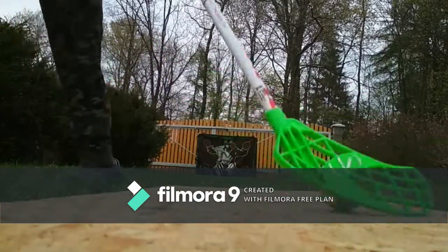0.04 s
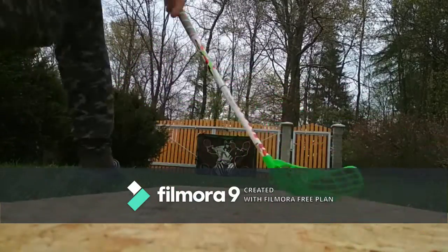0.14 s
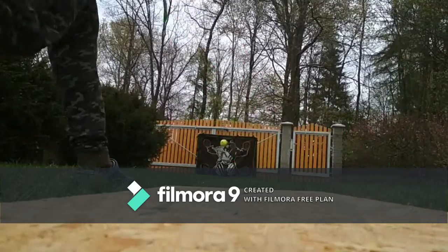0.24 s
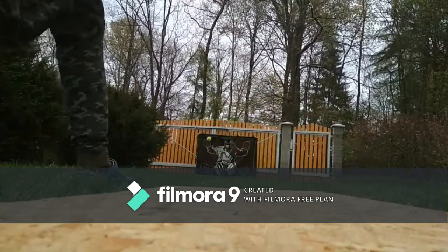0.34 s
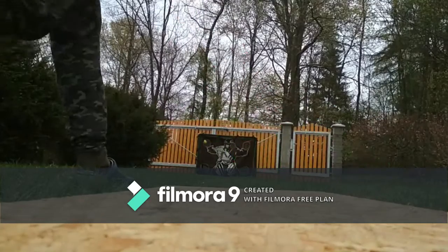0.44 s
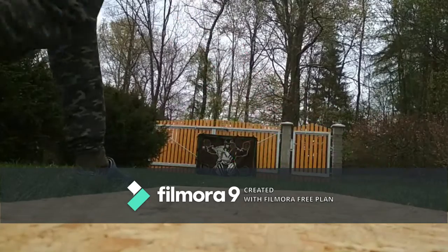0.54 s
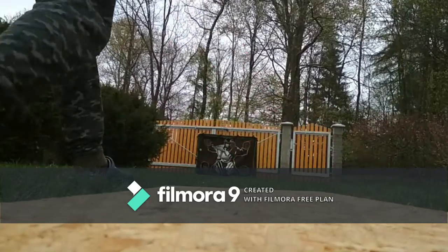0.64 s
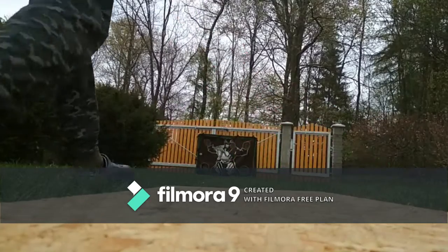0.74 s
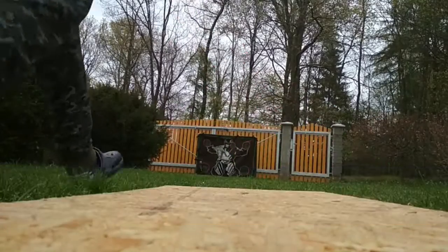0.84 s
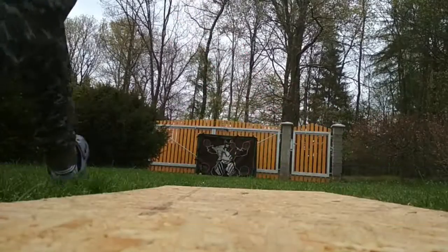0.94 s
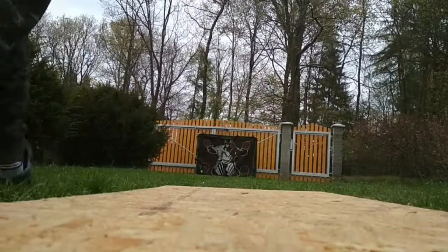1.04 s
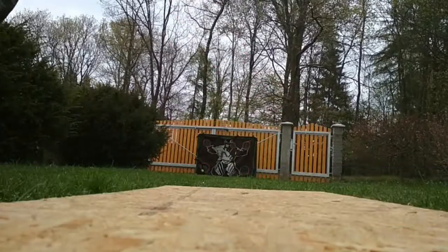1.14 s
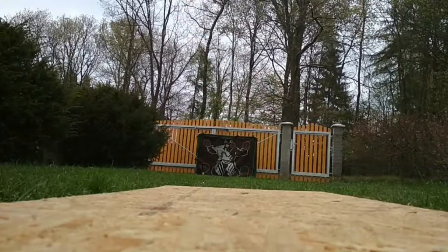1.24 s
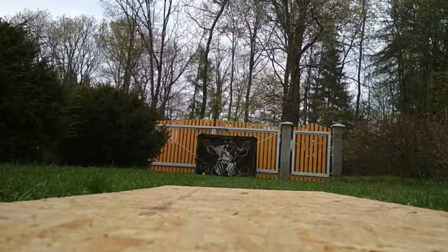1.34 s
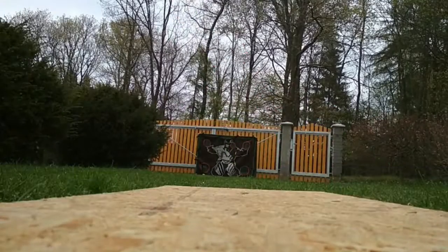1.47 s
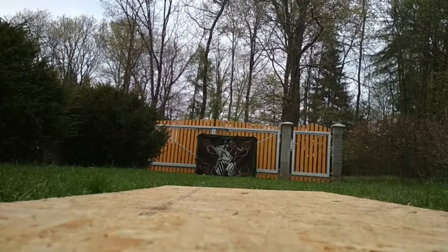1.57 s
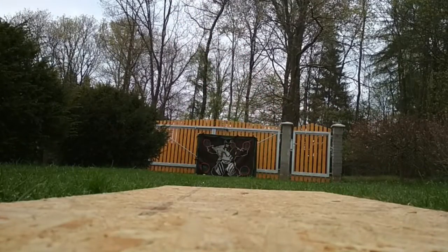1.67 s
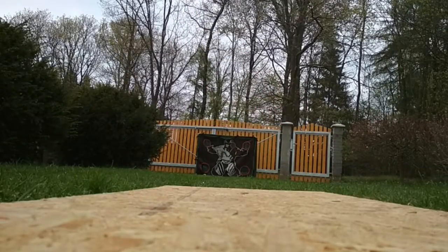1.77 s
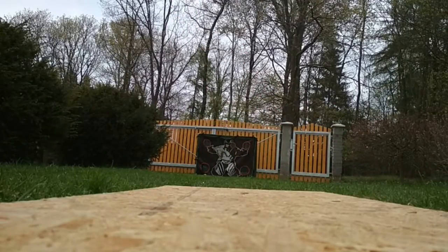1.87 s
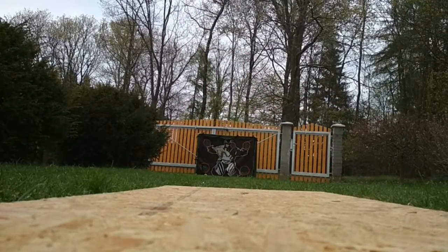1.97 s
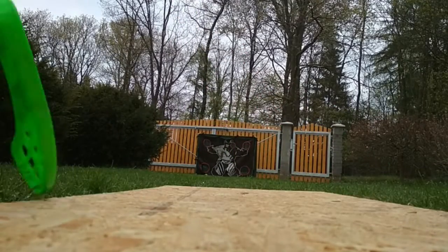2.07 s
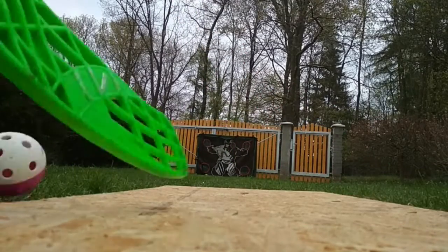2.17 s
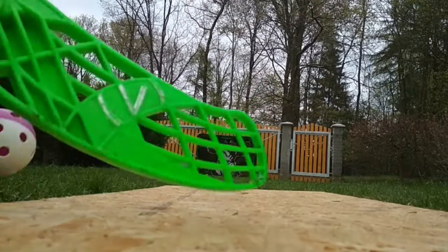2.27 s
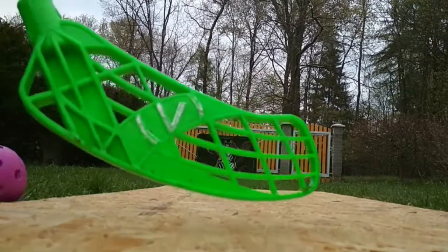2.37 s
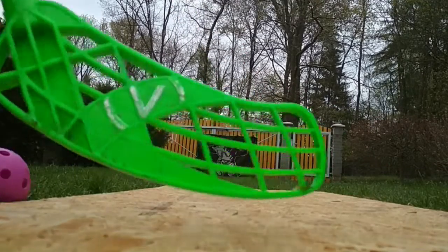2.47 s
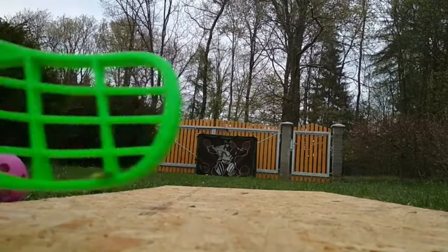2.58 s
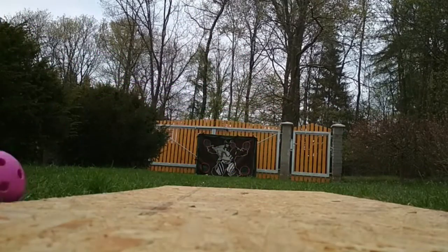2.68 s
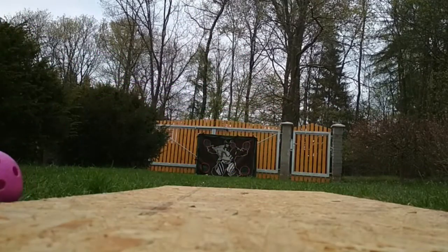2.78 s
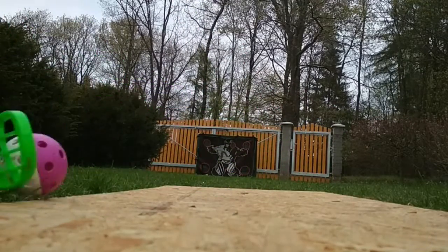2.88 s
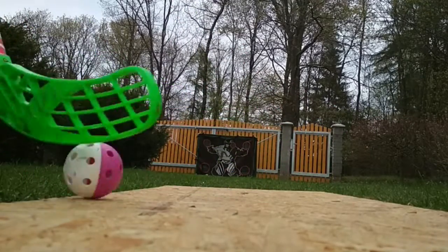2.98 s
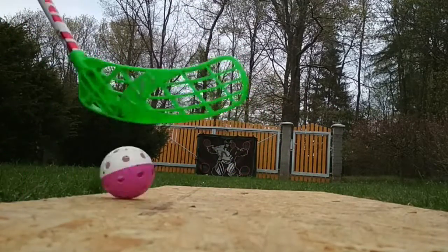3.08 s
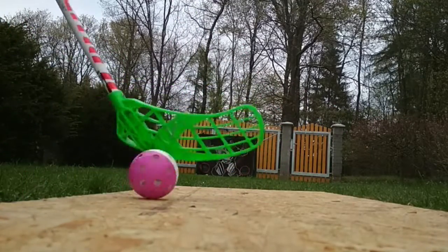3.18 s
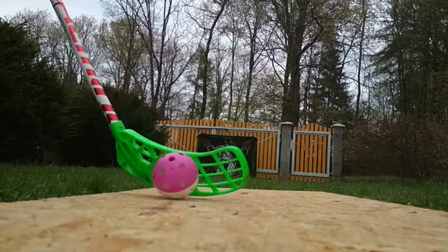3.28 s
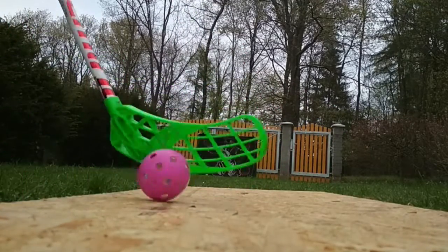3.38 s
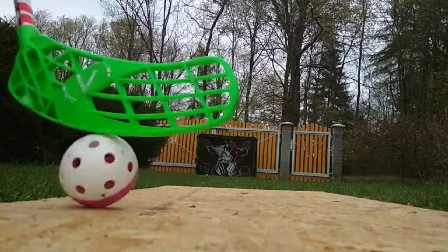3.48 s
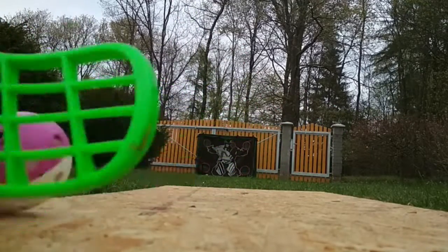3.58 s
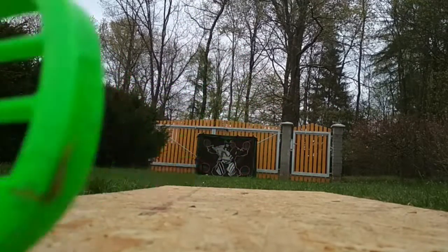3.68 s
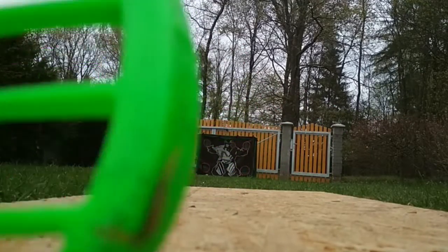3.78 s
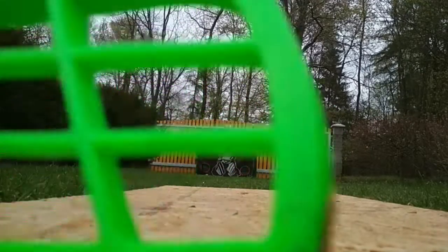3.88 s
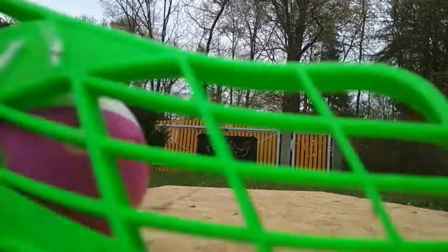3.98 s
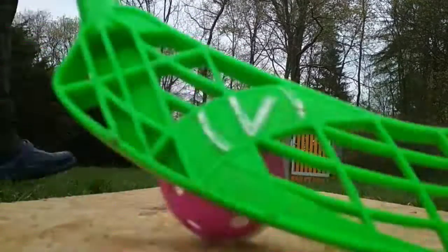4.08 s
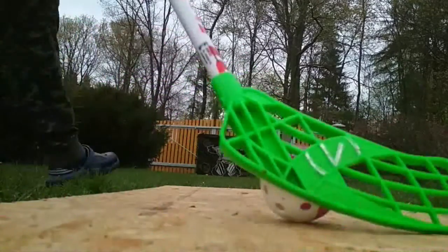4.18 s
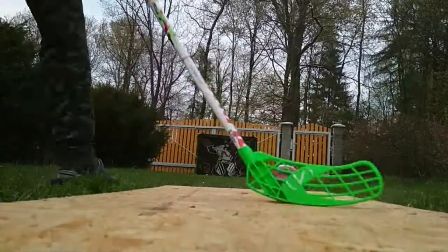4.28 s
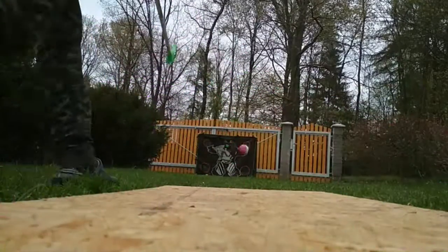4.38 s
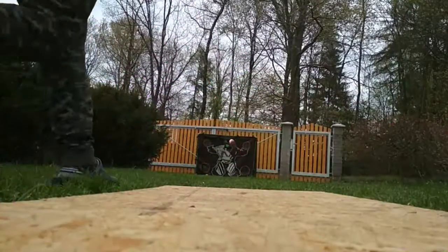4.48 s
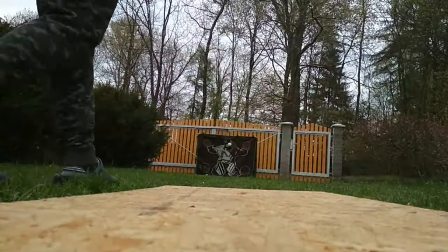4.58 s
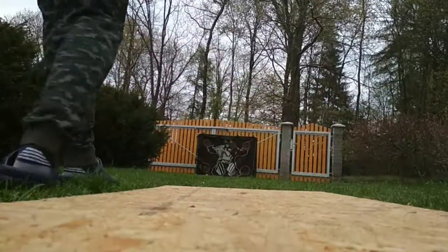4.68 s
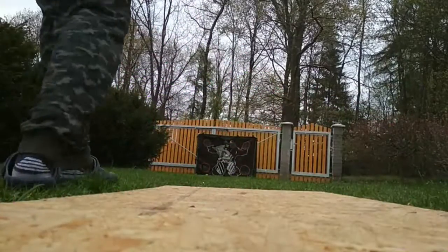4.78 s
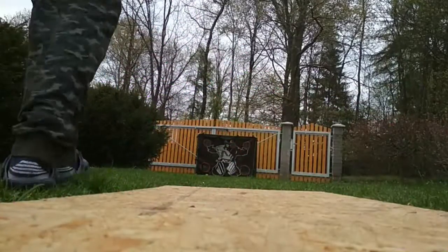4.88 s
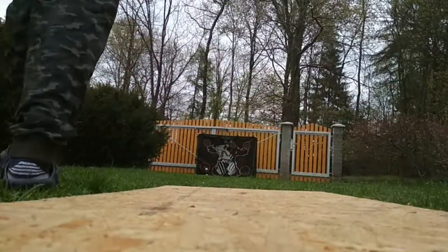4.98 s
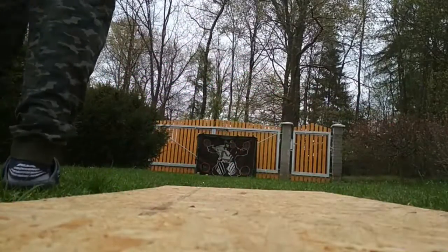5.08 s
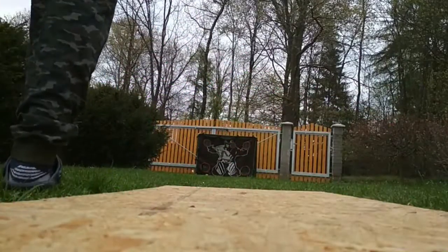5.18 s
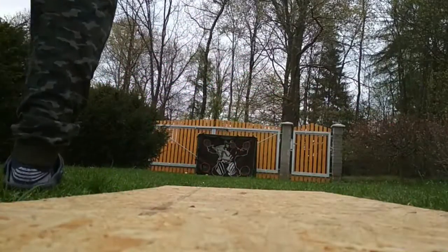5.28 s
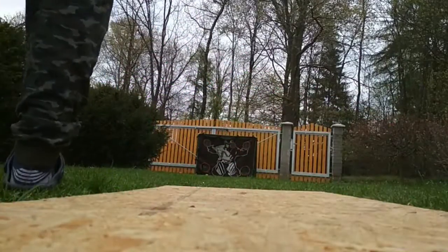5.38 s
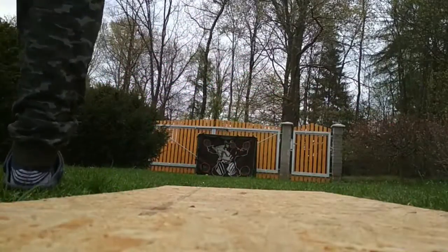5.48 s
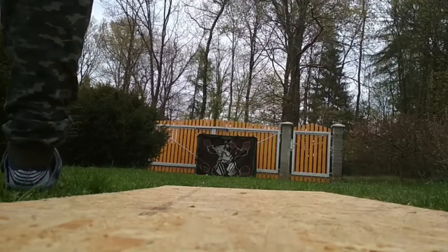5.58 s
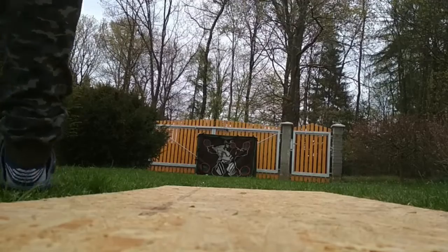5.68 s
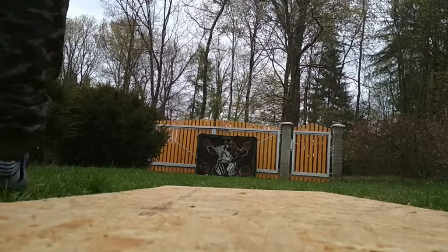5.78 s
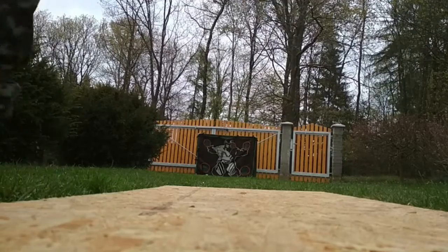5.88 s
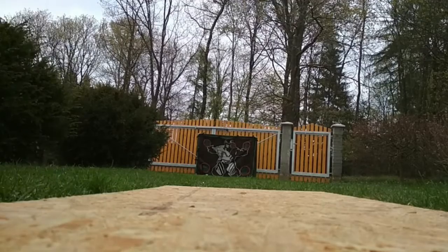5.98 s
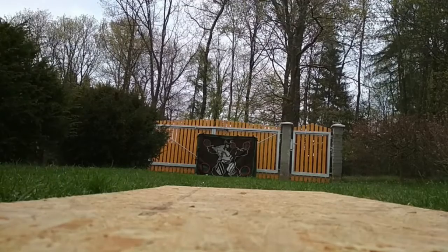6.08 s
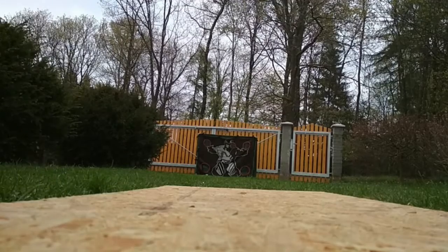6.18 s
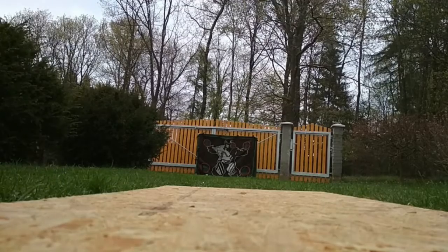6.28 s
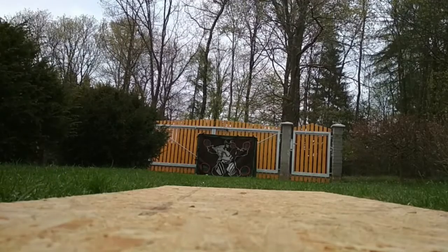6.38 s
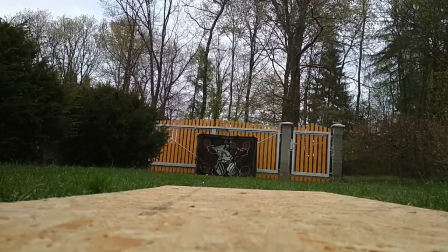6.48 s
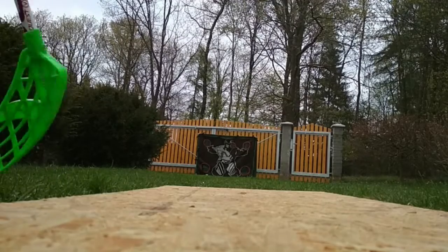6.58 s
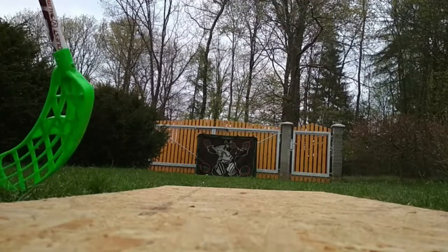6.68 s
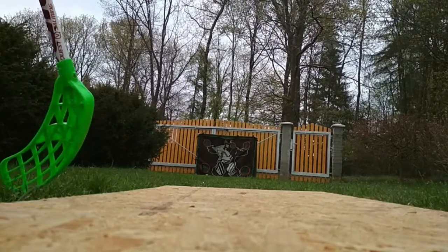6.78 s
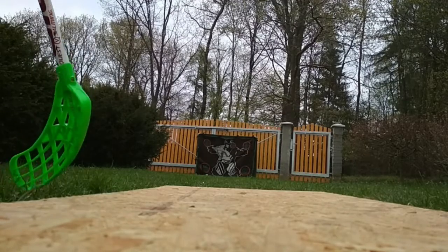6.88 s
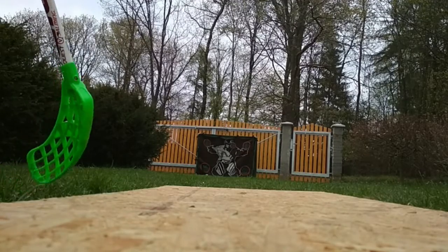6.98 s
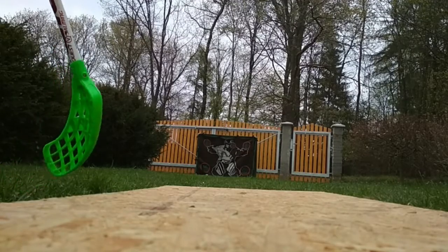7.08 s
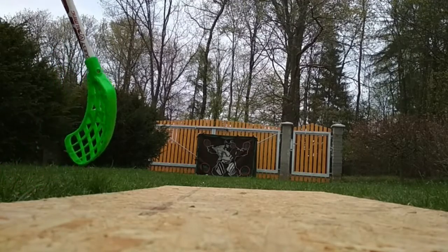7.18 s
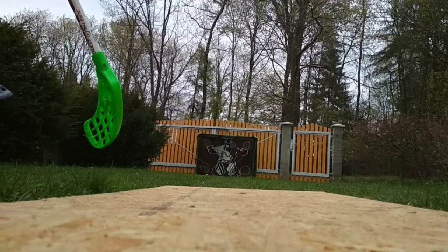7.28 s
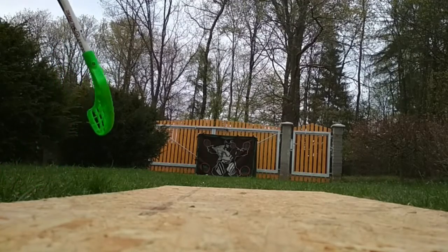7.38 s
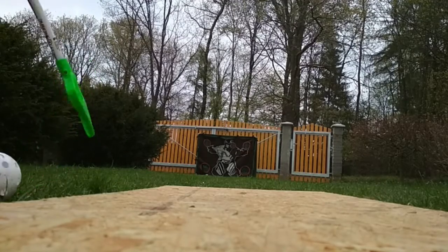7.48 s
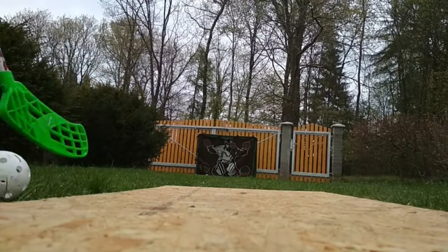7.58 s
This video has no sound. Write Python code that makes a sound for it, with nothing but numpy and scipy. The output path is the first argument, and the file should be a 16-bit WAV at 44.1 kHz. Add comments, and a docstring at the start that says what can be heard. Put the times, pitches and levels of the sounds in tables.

```python
"""A lawn with a wooden board on it: floorball practice, the microphones lying on the board.
Twice a blade sweeps a hollow plastic ball along the wood (shaped random jolts) and it smacks a tarpaulin
in the goal (pressure swings). In between the next ball is tapped onto the board (struck modes) and rolled
into place (small bumps). Filtered noise makes the rustle of clothes and grass, the light wind and soft
thuds; a far dog barks once (arched harmonics)."""
import sys
import numpy as np
from scipy import signal
from scipy.fft import rfft, irfft
from scipy.io import wavfile
from scipy.ndimage import uniform_filter1d

SR = 44100
rng = np.random.default_rng(int(sys.argv[2]) if len(sys.argv) > 2 else 0)


def to_wav(s):
    """Save 16-bit WAV."""
    ch = np.atleast_2d(s).T  # columns
    pcm = np.round(np.clip(ch, -1, 1) * 32767)  # PCM
    wavfile.write(sys.argv[1], SR, pcm.astype(np.int16))


N = 336924

# hard plastic contact: f/Hz, level/dB per Hz
CLICK_SPECTRUM = [(300, -11.5), (1200, 2.5), (2500, -1.5), (4500, -2.5), (7500, 0), (10500, 11.5),
                  (13000, 9), (16000, 3.5)]
RUSTLE_RISE_S = 0.054  # rustling bursts and reaches


def sweeps(ring=0.25, width_hz=250):
    """Ball and blade chatter over the wood, rising in pitch and loudness; the jolts shake board and plastic."""
    # two shots, a short scuff between: contact t/s, full speed t/s, release t/s, rattle/dB, low thrum/dB,
    # whirr/dB, rasp/dB, rattle f at contact/Hz, at release before the flick/Hz, flick of the wrist/0-1
    sweep_rows = [(0.0, 0.035, 0.275, -15.5, -20, -16, -31, 330, 470, 0.6),
                  (3.753, 3.755, 3.774, -25, -25, -35, -36, 240, 260, 0),
                  (4.066, 4.27, 4.449, -16.5, -18, -23, -31.5, 240, 450, 1)]
    # layer spectra: f/Hz, level/dB per Hz
    rattle_spectrum = [(100, -26.5), (260, -2), (620, -2.5), (1150, -10.5), (2600, -62.5)]
    thrum_spectrum = [(18, -47.5), (30, -8.5), (113, -0.5), (230, -4), (320, -29.5), (510, -120)]
    scrape_spectrum = [(530, -36.5), (900, -7), (1700, -3), (2560, -19.5), (3200, -17.5), (4160, -57),
                       (7040, -120)]
    hiss_spectrum = [(1530, -31.5), (2600, -6.5), (4530, 0.5), (7310, -8), (8320, -7.5), (9050, -10),
                     (9990, -3.5), (12600, -1), (15200, -4.5), (16000, -12.5)]
    # growth as the ball gathers speed, decay after release
    rattle_rise_db_per_s, thrum_rise_db_per_s, whirr_rise_db_per_s = 56, 40, 45
    scrape_rise_db_per_s, hiss_rise_db_per_s = 46.5, 28.5
    rattle_fall_db_per_s, thrum_fall_db_per_s, rasp_fall_db_per_s = 477.5, 284, 487.5
    bite_s = 0.0064  # the blade takes hold
    # flick just before release: layers flare, pitch leaps
    flick_lead_s, flick_width_s, flick_hz = 0.03, 0.042, 120
    flick_rattle_db, flick_scrape_db, flick_hiss_db = 6.5, 10, 3
    # at full speed the ball skims the wood and the thrum thins
    thin_db_per_s, thin_most_db = 123.5, 4
    # spinning ball: pitch at release, climb towards it
    whirr_release_hz, whirr_climb_hz_per_s = 790, 450

    t = np.arange(N) / SR
    gains, rattle_hz, whirr_hz = np.zeros((5, N)), np.zeros(N), np.zeros(N)
    for contact, full, release, shake_db, low_db, spin_db, rasp_db, first_hz, last_hz, wrist in sweep_rows:
        to_full_s = np.clip(full - t, 0, full - contact)
        to_release_s = np.clip(release - t, 0, release - contact)
        flick = wrist * np.exp(-((t - release + flick_lead_s) / flick_width_s) ** 2)
        thin_db = np.clip(thin_db_per_s * (t - full), 0, thin_most_db)
        length = release - contact
        shake = swell(contact, length, bite_s, rattle_fall_db_per_s)
        low = swell(contact, length, bite_s, thrum_fall_db_per_s)
        rasp = swell(contact, length, bite_s, rasp_fall_db_per_s)
        gains += [shake * amp(shake_db - rattle_rise_db_per_s * to_full_s + flick_rattle_db * flick),
                  low * amp(low_db - thrum_rise_db_per_s * to_full_s - thin_db),
                  rasp * amp(spin_db - whirr_rise_db_per_s * to_release_s),
                  rasp * amp(rasp_db - scrape_rise_db_per_s * to_full_s + flick_scrape_db * flick),
                  rasp * amp(rasp_db - hiss_rise_db_per_s * to_full_s + flick_hiss_db * flick)]
        climb_hz = np.interp(t, [contact, release], [first_hz, last_hz]) + flick_hz * flick
        rattle_hz = np.where(t >= contact, climb_hz, rattle_hz)
        whirr_hz = np.where(t >= contact, whirr_release_hz - whirr_climb_hz_per_s * to_release_s, whirr_hz)

    jolts = grains(per_s=410, spread_db=2.0)
    wood = evened(convolve(jolts, board_ring()))
    rattle = colour(resonate(jolts, rattle_hz, width_hz) + 0.4 * wood, rattle_spectrum)
    low_wood = colour(wood, [(220, -10.5), (320, -25), (900, -49.0)])
    thrum = colour(jolts, thrum_spectrum) + ring * low_wood
    whirr = resonate(jolts, whirr_hz, width_hz)
    # the plastic rasps harder at each jolt
    grip = np.sqrt(abs(evened(uniform_filter1d(abs(jolts[0]), 130))) + 0.2)
    plastic = colour(wood, [(700, -22.5), (1100, -7.5), (2000, 5.5), (3200, 2.0), (5000, -15.0)])
    scrape = 1.3 * colour(grip * grains(per_s=1800, spread_db=4), scrape_spectrum) + plastic
    hiss = colour(grip * grains(per_s=10000, spread_db=3.5), hiss_spectrum)
    layers = (steadied(rattle, size=600), steadied(thrum, size=900), steadied(whirr, size=600),
              mottled(steadied(scrape, size=700)), mottled(steadied(hiss, size=900)))
    return sum(gain * layer for gain, layer in zip(gains, layers))


def slaps(boom_trim_db=-1, tock_trim_db=-12):
    """The blade slaps the board during a sweep: a boom of a few cycles, with a tock from the ball."""
    # slaps: t/s, level/dB, f/Hz, time to swell/s
    slap_rows = [(0.009, -7, 140, 0.0026), (0.024, -5.5, 190, 0.0029), (0.033, -6, 304, 0.0011),
                 (0.054, -6, 560.6, .0015), (0.073, -7.5, 360, 0.0012), (0.081, -4.5, 360, 0.002),
                 (0.096, -6.5, 348, 0.0031), (0.141, -5, 490, 0.0018), (0.206, -3, 366, 0.0025),
                 (0.275, -5, 276, 0.0029), (4.101, -14, 323, 0.0023), (4.234, -1.5, 225, 0.00092),
                 (4.262, -4, 464, 0.0022), (4.289, -6, 305, 0.0012), (4.304, -3.5, 338, 0.00089),
                 (4.313, -2.5, 357, 0.0053), (4.335, -4, 370, 0.0024), (4.353, -2, 393, 0.0015),
                 (4.452, -15, 250, .011)]
    out, t = np.zeros((2, N)), np.arange(3000) / SR
    for s, db, hz, swell_s in slap_rows:
        envelope = t / swell_s * np.exp(1 - t / swell_s)
        boom = envelope * np.sin(2 * np.pi * hz * t)
        add(out, s, amp(db + boom_trim_db) * boom[None])
        add(out, s, amp(db + tock_trim_db) * tock())
    return out


def smacks(crack_trim_db=2, echo_s=.0078, echo_db=-11, flutter_db=-19.5, flutter_t60=.11):
    """The tarpaulin snaps taut in one pressure swing, snaps again more weakly and flutters out."""
    # smack and flap back: t/s, level/dB, swing rate f/Hz (scaled below), crack/dB, rounding of the attack/s
    smack_rows = [(0.7068, -2.5, 250, -18, 0.0001), (0.762, -18, 215, -62, 0.0012),
                  (4.9125, -2, 240, -24, 0.0001), (4.967, -14, 200, -56, 0.001)]
    # crack: f/Hz, level/dB per Hz
    crack_spectrum = [(300, -50), (1000, -4), (2500, 5), (4000, 16), (7500, 6), (11000, 13), (16000, 12)]
    out, t = np.zeros((2, N)), np.arange(SR // 4) / SR
    for s, db, hz, crack_db, soft_s in smack_rows:
        u = 2.49 * hz * t
        # a short suck, then a longer push, once the sign is turned
        swing = u * (1 - u ** 2) * np.exp(-u ** 2) * (1 - np.exp(-t / soft_s))
        flutter = colour(noise(len(t)), [(40, 2), (150, 0), (600, 5), (1400, -14), (9000, -50)])
        crack = click(crack_spectrum, t60=0.0037, tail_db=-35.5, tail_t60=0.046)
        add(out, s, -amp(db) * peaked(swing[None]))
        add(out, s + echo_s, amp(db + echo_db) * push(hz * 2.37, damping=0.81))
        add(out, s, amp(db + flutter_db - 60 * t / flutter_t60) * flutter)
        add(out, s, amp(crack_db + crack_trim_db) * crack)
    return out


def knocks(ring_trim_db=-2, tock_trim_db=-1, click_trim_db=9, hardness_hz=1100):
    """Each blow swings the wood under it, rings the board, sounds the hollow ball and clicks in the plastic."""
    # blows of ball and blade: t/s, level/dB, f/Hz, ball tock/dB, plastic click/dB, board ring/dB
    knock_rows = [(2.275, -12, 264, -14.5, -27, 2), (2.283, -9, 483, -20, -59, -2),
                  (2.299, -13, 210, -51, -58, -10), (2.554, -21.5, 260, -45.5, -51.5, 4),
                  (2.947, -41, 605, -28.5, -27.5, 8), (2.986, -19.5, 423, -42, -33, -4),
                  (3.1036, -8.5, 560, -23.5, -59, -18), (3.111, -16, 530, -37, -58, -7),
                  (3.185, -25, 480, -42, -53, -8), (3.205, -25, 483, -54, -55, -7),
                  (3.423, -16.5, 398, -26.5, -23, 1.5), (3.453, -18, 520, -33, -32.5, -3.5),
                  (3.486, -23, 550, -29.5, -29.5, 3), (3.596, -4, 485, -17, -28.5, -16.5),
                  (3.754, -9.5, 211, -29, -27.5, 0), (3.815, -26, 300, -30, -22.5, -2),
                  (3.859, -20, 322, -37.5, -36, -7), (4.066, -15, 320, -43.5, -29.5, 13.5)]
    out, t = np.zeros((2, N)), np.arange(600) / SR
    force = t * np.exp(-2 * np.pi * hardness_hz * t)
    for s, db, hz, ball_db, tick_db, board_db in knock_rows:
        body = amp(ring_trim_db + board_db) * peaked(convolve(force, board_ring()))
        add(body, 0, amp(-8) * push(hz, damping=1.1))
        tick = click(CLICK_SPECTRUM, t60=.008, tail_db=-31, tail_t60=0.07)
        add(out, s + 0.0013, amp(db) * peaked(body))
        add(out, s, amp(ball_db + tock_trim_db) * tock())
        add(out, s, amp(tick_db + click_trim_db) * tick)
    return out


def rolling(rumble_trim_db=-4, clack_trim_db=1, ring_trim_db=-14, click_trim_db=5, tock_trim_db=-12):
    """The holed ball trundles over the grain in small bumps, with a dry hollow clack where a rim drops."""
    # slow roll: t/s, level/dB
    roll_curve = [(3.13, -29.5), (3.2, -35), (3.33, -42), (3.45, -33.5), (3.61, -27.5), (3.72, -35.5),
                  (3.8, -32), (3.87, -39.5), (4.08, -27.5)]
    # rims of the holes drop on the wood: t/s, level/dB, f/Hz, click/dB
    clack_rows = [(3.506, -22, 563, -36), (3.532, -24.5, 524, -48), (3.548, -18, 547.6, -45.5),
                  (3.5626, -14.5, 528, -47), (3.58, -21, 561, -50), (3.631, -11, 513, -58),
                  (3.663, -20.5, 374, -61), (3.687, -13.5, 342.6, -70), (3.726, -15, 280, -48.5),
                  (3.7415, -15, 288.8, -51), (3.929, -23, 190, -48)]
    # rumble of the roll: f/Hz, level/dB per Hz
    roll_spectrum = [(40, -16), (200, -2), (480, -1.5), (1200, -45), (2860, -100)]
    jolts = grains(per_s=220, spread_db=3.5)
    bumps = colour(jolts, roll_spectrum) + .5 * evened(convolve(jolts, board_ring()))
    out = amp(rumble_trim_db) * level(roll_curve) * steadied(bumps, size=2000)
    for s, db, hz, tick_db in clack_rows:
        blow = peaked(push(hz, damping=0.87))
        ring = peaked(convolve(blow, board_ring()))
        tick = click(CLICK_SPECTRUM, t60=.01, tail_db=-23, tail_t60=.05)
        add(out, s + .001, amp(db + clack_trim_db) * blow)
        add(out, s + 0.00055, amp(db + ring_trim_db) * ring)
        add(out, s, amp(db + tock_trim_db) * tock(t60=0.015))
        add(out, s, amp(tick_db + click_trim_db) * tick)
    return out


def taps(body_trim_db=2, t60=0.067):
    """Small dull taps on lawn and board: decaying noise bursts, with a tick of hollow plastic."""
    # taps: t/s, level/dB, f/Hz, click/dB
    tap_rows = [(1.329, -40.5, 475, -33.5), (1.523, -38.5, 1750, -60), (1.691, -29, 640, -26.5),
                (2.052, -39, 690, -35.5), (2.476, -41, 158, -38), (5.689, -35, 1820, -30),
                (5.851, -34.5, 1350, -33.5), (6.436, -28, 586, -29.5), (7.022, -32.5, 263, -41),
                (7.114, -39.5, 326, -56), (7.591, -49, 700, -27.5)]
    out, t = np.zeros((2, N)), np.arange(6000) / SR
    for s, db, hz, tick_db in tap_rows:
        spectrum = [(hz / 3, -20), (hz, 0), (hz * 2.04, -12), (hz * 1.78, -5), (hz * 12, -46)]
        body = colour(noise(len(t)), spectrum) * amp(-60 * t / t60)
        tick = click(CLICK_SPECTRUM, t60=0.011, tail_db=-24, tail_t60=.08)
        add(out, s, amp(db + body_trim_db) * peaked(body))
        add(out, s, amp(tick_db) * tick)
    return out


def rustle(flutter_db=2, fall_db_per_s=102):
    """Short bursts of rustling noise: a cloth-like swish and a grass-like crunch, in uneven little surges."""
    # short bursts of rustling noise, one just before the first smack: t/s, length/s, swish/dB, crunch/dB
    burst_rows = [(0.25, 0.13, -54.5, -53), (0.639, 0.041, -49.5, -49.5), (1.268, 0.24, -53.5, -54.5),
                  (1.644, 0.16, -61, -60), (1.818, 0.26, -48.5, -52), (2.729, 0.21, -48, -63.5),
                  (2.923, 0.39, -52, -57.5), (3.923, 0.35, -41, -58.5), (4.418, 0.15, -51.5, -53.5),
                  (4.664, 0.13, -51, -52), (4.764, 0.05, -46.5, -47), (5.299, 0.1, -53, -54.5),
                  (5.611, 0.052, -42.5, -47.5), (5.79, 0.15, -51, -59), (6.028, 0.12, -50, -58.5),
                  (6.26, 0.058, -50.5, -54), (6.433, 0.12, -62.5, -69), (6.916, 0.16, -59, -63.5),
                  (7.56, 0.043, -59, -55)]
    # swish and crunch: f/Hz, level/dB per Hz
    cloth_spectrum = [(1760, -30), (3000, -20), (3310, -17.5), (7250, -13.5), (10500, -6), (12200, -3.5),
                      (14600, -9.5), (16000, -12.5)]
    grass_spectrum = [(120, -25), (200, -8.5), (654, 1), (1120, -7.5), (1820, -3), (2200, -8), (4200, -16),
                      (7000, -46)]
    swish, crunch = np.zeros((2, N))
    for s, length, swish_db, crunch_db in burst_rows:
        burst = swell(s, length, RUSTLE_RISE_S, fall_db_per_s)
        swish = np.maximum(swish, amp(swish_db) * burst)
        crunch = np.maximum(crunch, amp(crunch_db) * burst)
    slow = uniform_filter1d(uniform_filter1d(rng.standard_normal(N), 900), 500)
    surges = amp(flutter_db * evened(slow))
    cloth = mottled(colour(grains(per_s=4700, spread_db=-4.5), cloth_spectrum), patchy_db=2.5)
    grass = mottled(colour(grains(per_s=1200, spread_db=2.0), grass_spectrum))
    return surges * (swish * cloth + crunch * grass)


def sleeves(fall_db_per_s=102):
    """Jacket sleeves brush softly, hollow-sounding noise, as the player reaches with the stick."""
    # reaches: t/s, length/s, level/dB
    reach_rows = [(2.855, 0.26, -53), (3.122, 0.18, -63), (6.65, 0.36, -66.5)]
    # sleeve: f/Hz, level/dB per Hz
    sleeve_spectrum = [(900, -24), (1500, 1.5), (2100, -10), (3200, -20), (8000, -25)]
    reach = sum(amp(db) * swell(s, length, RUSTLE_RISE_S, fall_db_per_s) for s, length, db in reach_rows)
    return reach * mottled(colour(noise(N), sleeve_spectrum))


def dog(second_db=-3, hoarse_db=-18, echo_s=0.085, echo_db=-7, wet_db=-6):
    """One far bark: an arch of pitch, two harmonics and a hoarse band between, thrown back by the woods."""
    start_s, length_s, top_s = 1.54, 0.165, 0.095
    top_hz, sag_hz, bark_db = 535, 270, -50
    t = np.clip(np.arange(N) / SR - start_s, 0, length_s)
    waver = 1 + 0.23 * uniform_filter1d(rng.standard_normal(N), 150)
    hz = (top_hz - sag_hz * (t / top_s - 1) ** 2) * waver
    phase = 2 * np.pi * np.cumsum(hz) / SR
    effort = amp(bark_db) * np.sqrt(abs(np.sin(np.pi * t / length_s)))
    hoarse = resonate(rng.standard_normal(N), 1.5 * hz, 350)
    bark = effort * (np.sin(phase) + amp(second_db) * np.sin(2 * phase) + amp(hoarse_db) * hoarse)
    echo = amp(echo_db) * np.roll(bark, round(echo_s * SR))
    return bark + echo + amp(wet_db) * garden(bark)


def wind_and_thuds(thud_hz=75, thud_decay_s=0.016, apart=0.95, lee_db=-20):
    """Low lumps of light breeze and soft low thuds (puffs of wind and one footstep), weaker on the left."""
    # spells of breeze: t/s, length/s, level/dB
    breeze_rows = [(0, 1.47, -56), (1.509, 3.3, -60.5), (5.097, 1.5, -71), (6.267, 2.5, -62.5)]
    # soft low thuds, puffs of wind and one footstep (5.673 s): t/s, level/dB
    thud_rows = [(0.64, -42.5), (1.137, -44), (1.402, -42.5), (5.673, -35.5), (6.281, -44.5), (6.58, -46.5)]
    # rumble of the breeze: f/Hz, level/dB per Hz
    rumble_spectrum = [(20, -3.5), (50, 6), (90, -6), (150, -9), (250, -27.5), (600, -45)]
    breeze = sum(amp(db) * swell(s, length, rise_s=0.1, fall_db_per_s=60) for s, length, db in breeze_rows)
    lumps = grains(per_s=100, spread_db=-1.0) + apart * rng.standard_normal((2, N))
    out = breeze * colour(lumps, rumble_spectrum)
    t = np.arange(SR // 4) / SR
    thud_spectrum = [(thud_hz / 4, -12), (thud_hz, 0), (thud_hz * 2, -9), (thud_hz * 6, -45), (thud_hz * 20, -100)]
    for s, db in thud_rows:
        thud = colour(noise(len(t)), thud_spectrum) * t * np.exp(-t / thud_decay_s)
        add(out, s, amp(db) * peaked(thud))
    return 2 * out * amp([[lee_db], [0]]) / (1 + amp(lee_db))


def outdoors():
    """Still air, a thin hiss that drifts upward and a far fluttering whine, all shaped noise."""
    # still air: f/Hz, level/dB per Hz
    air_spectrum = [(59, -37), (100, 0), (260, -32.5), (1600, -28), (6420, -39), (11600, -17), (16000, -38)]
    # thin hiss: f/Hz, level/dB per Hz
    sizzle_spectrum = [(3200, -9), (3650, 1), (4800, 6), (5700, -15.5)]
    air = amp(-71.5) * colour(noise(N), air_spectrum)

    start_s, length_s, sizzle_db, climb_hz_per_s = 2.27, 0.55, -59, 600
    from_middle_s = np.arange(N) / SR - start_s - length_s / 2
    drift = np.exp(1j * np.pi * climb_hz_per_s * from_middle_s ** 2)  # shifts the band in frequency
    sizzle = (drift * signal.hilbert(colour(noise(N), sizzle_spectrum))).real
    sizzle *= amp(sizzle_db) * swell(start_s, length_s, rise_s=0.066, fall_db_per_s=223)

    start_s, length_s, whine_db, whine_hz, width_hz, flutter_db = 0.3, 2.0, -78, 1087, 40, 3
    flutter = flutter_db * evened(uniform_filter1d(rng.standard_normal(N), 5000))
    whine = resonate(noise(N), np.full(N, whine_hz), width_hz)
    whine *= amp(whine_db + flutter) * swell(start_s, length_s, rise_s=0.04, fall_db_per_s=46.5)
    return air + sizzle + whine


def garden(x):
    """Scattered echoes from fence, hedge and trees, each band dying at its own speed."""
    # echo decay: f/Hz, t60/s
    decay = [(100, 0.7), (400, 0.8), (1200, 1), (4000, 1), (12000, 0.5)]
    echoes = rng.standard_normal((2, SR)) * (rng.random((2, SR)) < 2500 / SR)
    echoes *= np.arange(SR) > .012 * SR
    hz, t, z = signal.stft(echoes, SR, nperseg=256)
    tail = signal.istft(z * amp(-60 * t / read(decay, hz)[:, None]), SR, nperseg=256)[1]
    return convolve(x, tail / np.linalg.norm(tail[0]))


def board_ring(scatter=0.14, grain_db=-1, grain_t60=0.11):
    """The board's impulse response: decaying modes, fresh phases at each spot and microphone; left energy 1."""
    # main modes: f/Hz, level/dB, t60/s
    modes = [(109, -5, 0.12), (145, -4, .15), (195, -1.5, 0.14), (233, -2, 0.15), (304, -5, 0.12),
             (360, -1, .11), (452, -4, 0.1), (515, -4, .08), (589, -2, .1), (650, -6, .07), (780, -8, 0.04),
             (910, -9, .05), (1181, -11, .045), (1380, -10, .04), (1850, -19, .04)]
    # many finer modes: f/Hz, level/dB per Hz
    fine_spectrum = [(100, -5.5), (400, 19), (1200, -9.5), (2200, -13.5), (9000, -41.5)]
    t = np.arange(SR // 3) / SR
    hz, db, t60 = np.transpose(modes)[:, :, None]
    phase = rng.uniform(0, 2 * np.pi, hz.shape) + scatter * hz / 600 * rng.standard_normal((2, len(hz), 1))
    ring = (amp(db - 60 * t / t60) * np.sin(2 * np.pi * hz * t + phase)).sum(1)
    ring += amp(grain_db - 60 * t / grain_t60) * colour(noise(len(t)), fine_spectrum)
    ring *= 1 - np.exp(-(t / 0.000087) ** 2)
    return ring / np.linalg.norm(ring[0])


def tock(t60=.03, tail_db=-19, tail_t60=.07):
    """The short hollow sound of the plastic ball; peak 1."""
    # hollow ball: f/Hz, level/dB per Hz
    ball_spectrum = [(500, -0.5), (850, 2), (1250, -6.5), (2300, -18), (4000, -33.5)]
    return click(ball_spectrum, t60, tail_db, tail_t60)


def click(spectrum, t60, tail_db, tail_t60, rise_s=0.0016):
    """A burst of hard contact with a short rattle after it; peak 1."""
    t = np.arange(4096) / SR
    fade = amp(-60 * t / t60) + amp(tail_db - 60 * t / tail_t60)
    attack = 1 - np.exp(-(t / rise_s) ** 2)
    return peaked(colour(noise(len(t)), spectrum) * fade * attack)


def push(hz, damping):
    """One swing of a struck surface: out, back and nearly at rest."""
    turns = hz * np.arange(1500) / SR
    return (np.sin(2 * np.pi * turns) * np.exp(-(turns * damping) ** 2))[None]


def grains(per_s, spread_db):
    """Random tiny impacts with exponentially spread levels; rms 1."""
    size = amp(spread_db * np.minimum(rng.exponential(1, N), 3)) * (rng.random(N) < per_s / SR)
    return evened(pair(size * rng.standard_normal((2, N))))


def noise(size):
    """Stereo white noise, alike in the bass."""
    return pair(rng.standard_normal((2, size)))


def pair(x):
    """Makes two unrelated signals alike in the bass, as two close microphones hear them."""
    # left-right likeness near the board: f/Hz, likeness/0-1
    likeness = [(100, .91), (350, .95), (700, .76), (1300, .2), (3000, .1), (12000, .08)]
    size = x.shape[1]
    same = np.clip(read(likeness, np.fft.rfftfreq(size, 1 / SR)), 0, 1)
    mid, side = rfft(x) * np.sqrt([1 + same, 1 - same])
    return irfft(np.array([mid + side, mid - side]), size) / 2


def resonate(x, hz, width):
    """A resonance that follows the curve hz: shift down, smooth, shift back; rms 1."""
    turn, r = np.exp(2j * np.pi * np.cumsum(hz) / SR), np.exp(-np.pi * width / SR)
    smooth = signal.lfilter([(1 - r) ** 2], [1, -2 * r, r * r], x / turn + 1e-18)
    return evened((turn * smooth).real)


def mottled(x, patchy_db=3.0):
    """The colour of a rasp keeps shifting as the point of contact wanders."""
    z = signal.stft(x, nperseg=512)[2]
    patches = uniform_filter1d(rng.standard_normal(z.shape[1:]), size=7, axis=0)
    patches = evened(uniform_filter1d(patches, size=4, axis=1))
    return evened(signal.istft(z * amp(patchy_db * patches))[1][:, :N]) * np.std(x)


def steadied(x, size=1800):
    """Takes out slow swells, keeping the fast grain."""
    power = uniform_filter1d(uniform_filter1d((x ** 2).mean(0), size), size)
    return x / np.sqrt(abs(power) + 1e-4)


def swell(start, length, rise_s, fall_db_per_s):
    """A gain over time: rises, holds until the length is over, then dies away."""
    t = np.arange(N) / SR - start
    return np.clip(t / rise_s, 0, 1) * amp(-np.clip(fall_db_per_s * (t - length), 0, 200))


def level(rows):
    """The gain over time from a dB curve, silent outside it."""
    return amp(np.interp(np.arange(N) / SR, *np.transpose(rows), left=-150, right=-150))


def colour(x, spectrum):
    """Filters x by a spectrum; rms 1."""
    size = x.shape[-1]
    return evened(irfft(rfft(x) * amp(read(spectrum, np.fft.rfftfreq(size, 1 / SR))), size))


def tilted(x, balance):
    """Shares each frequency between left and right, keeping the power."""
    half_db = read(balance, np.fft.rfftfreq(N, 1 / SR)) / 2
    gains = amp([half_db, -half_db])
    return irfft(rfft(x) * gains / np.sqrt((gains ** 2).mean(0)), N)


def lagged(x, lag_s):
    """Sound from the right reaches the left microphone later."""
    return np.array([np.interp(np.arange(N) - lag_s * SR, np.arange(N), x[0]), x[1]])


def convolve(x, response):
    """Passes x through an impulse response."""
    return signal.fftconvolve(np.atleast_2d(x), response, axes=1)[:, :N]


def read(points, hz):
    """Interpolates a table over log frequency."""
    f, value = np.transpose(points)
    return np.interp(np.log(hz + 1), np.log(f + 1), value)


def add(mix, s, sound):
    """Mixes a sound in at s seconds."""
    part = mix[:, max(round(s * SR), 0):][:, :sound.shape[1]]
    part += sound[:, :part.shape[1]]


def amp(db):
    """Decibels to gain."""
    return np.exp(np.asarray(db) * np.log(10) / 20)


def evened(x):
    """Scales to rms 1."""
    return x / np.sqrt(np.mean(x ** 2) + 1e-20)


def peaked(x):
    """Scales the mean of the channels to peak 1."""
    return x / (abs(x.mean(0)).max() + 1e-12)


def scene(board_wet_db=-32, goal_wet_db=-23):
    """Places each source in the stereo field and sends board and goal into the garden's echo."""
    # left minus right near the player: f/Hz, level/dB
    player_balance = [(200, 2.5), (900, 2.5), (3500, -3.5), (6300, -10.5), (10000, -7), (14000, 3)]
    # left minus right for the blade swinging past: f/Hz, level/dB
    sweep_balance = [(110, 5.5), (400, 3), (1400, 4.5), (4500, 2.5), (7500, -6.5), (11000, -2),
                     (14500, 6.5)]
    shots = tilted(sweeps() + slaps(), sweep_balance)
    goal = smacks()
    ball = tilted(lagged(knocks() + rolling(), lag_s=0.000274), player_balance)
    player = tilted(lagged(taps() + rustle() + sleeves(), lag_s=.0004), player_balance)
    board = shots + ball
    echo = garden(amp(board_wet_db) * board + amp(goal_wet_db) * goal)
    return board + goal + player + echo + dog() + wind_and_thuds() + outdoors()


def record(dry, low_cut_hz=55, edge_hz=16300):
    """The microphones lose the deepest bass; the loudest peaks round off; then the band limit."""
    heard = signal.sosfilt(signal.butter(2, low_cut_hz, "highpass", fs=SR, output="sos"), dry)
    rounded = heard / (1 + (heard / .95) ** 6) ** (1 / 6)
    band_limit = signal.firwin(511, edge_hz, window=("kaiser", 9), fs=SR)
    return signal.oaconvolve(rounded, band_limit[None], "same")


dry = scene()
out = record(dry)
to_wav(out)
```